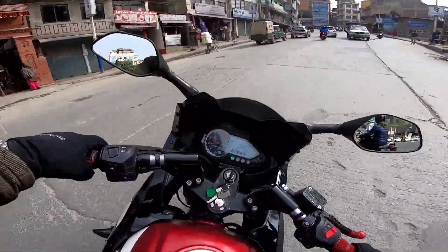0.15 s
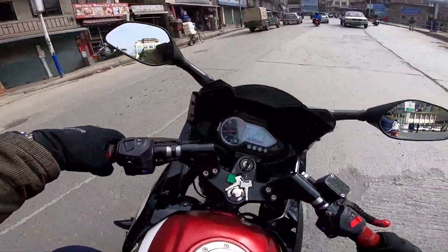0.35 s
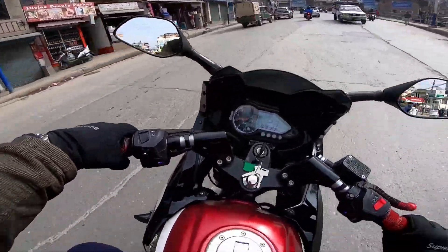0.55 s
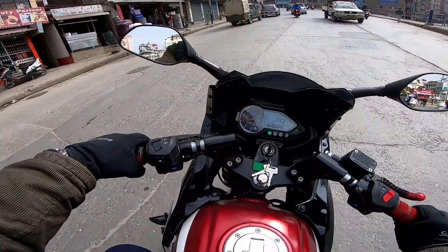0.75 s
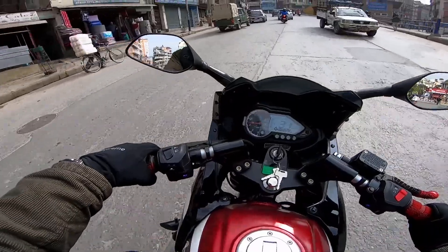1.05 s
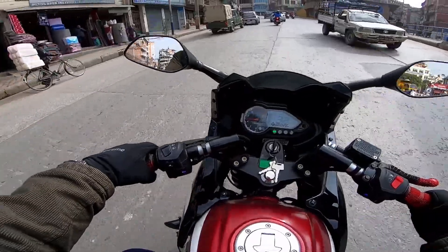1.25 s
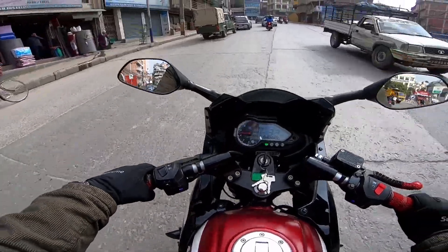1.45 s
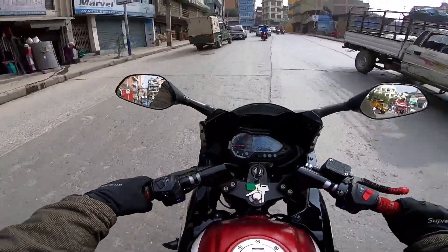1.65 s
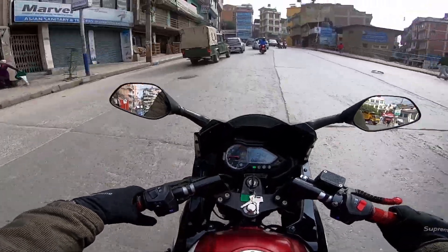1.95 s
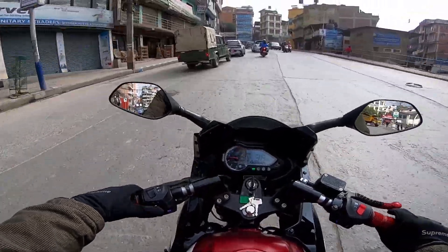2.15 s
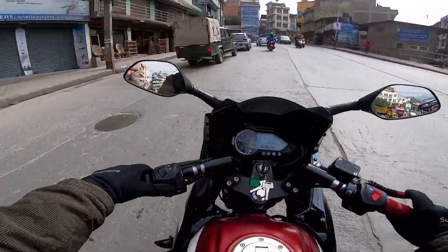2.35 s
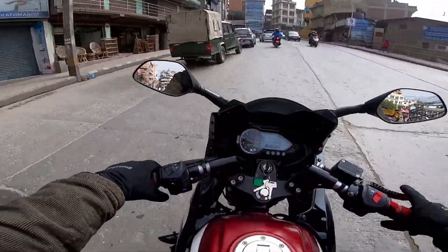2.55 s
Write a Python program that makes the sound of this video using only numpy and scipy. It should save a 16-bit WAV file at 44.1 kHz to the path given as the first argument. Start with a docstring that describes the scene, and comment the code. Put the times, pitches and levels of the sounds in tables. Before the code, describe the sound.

A single-cylinder motorcycle engine thrums and clatters throughout, close to the rider, over wind rumble and faint traffic. The revs flare briefly at 0.5 seconds, then climb steadily with a thin gear whine until the throttle shuts at 2.6. Faint tyre scuffs and high brake squeaks come mostly in the first second. A pickup swishes softly past around 1.4 seconds. Light plastic clicks and bodywork knocks are scattered along the way.

```python
"""Motorcycle on a busy street

A single-cylinder motorcycle, heard from the seat: the revs climb, flare once, and the throttle shuts.
Each firing booms through the pipe and airbox and sets the engine clattering; the crank shakes at twice
the firing rate and the gears whine. Around it are wind, traffic, a pickup passing the other way,
road scuffs, faint brake squeaks, plastic clicks and knocks of the bodywork over bumps."""
import sys
import numpy as np
from scipy.fft import rfft, irfft, next_fast_len
from scipy.io import wavfile
from scipy.ndimage import uniform_filter1d, minimum_filter1d, map_coordinates

SR = 44100
rng = np.random.default_rng(int(sys.argv[2]) if len(sys.argv) > 2 else 0)


def to_wav(sig):
    """Store sig (one row per channel, or 1-D mono) as 16-bit WAV at the path in sys.argv[1].

    Samples outside -1..1 are clipped; the rate is SR.
    """
    pcm = np.clip(np.atleast_2d(sig), -1, 1) * 32767
    pcm = np.round(pcm).astype(np.int16)
    wavfile.write(sys.argv[1], SR, pcm.T)  # frames by channels


N = 119070  # 2.7 s


def amp(db):
    """Turn decibels into a gain to multiply by."""
    return 10 ** (np.asarray(db) / 20)


def unit(x):
    """Scale a signal to an average (rms) size of 1."""
    return x / np.sqrt(np.mean(x ** 2) + 1e-20)


def along(points, hz):
    """Read between (f/Hz, value) points on a log frequency axis."""
    f, v = np.transpose(points)
    return np.interp(np.log(hz + 1), np.log(f + 1), v)


def clock():
    """The time of each sample in seconds."""
    return np.arange(N) / SR


def curve(rows):
    """Join (t/s, value) points with straight lines."""
    return np.interp(clock(), *np.transpose(rows))


def wobble(rate):
    """A smooth curve through `rate` random values a second."""
    return map_coordinates(rng.standard_normal(4096), [clock() * rate], mode="wrap")


def filtered(x, response):
    """Scale each frequency in x by the gain response(hz)."""
    size = next_fast_len(N + SR // 2)
    return irfft(rfft(x, size) * response(np.fft.rfftfreq(size, 1 / SR)), size)[..., :N]


# Stereo width, as side level against mid level: f/Hz, level/dB
STEREO_WIDTH = [(60, -65.5), (300, -28), (500, -38), (700, -17.5), (1400, -35), (2800, -30), (5000, -20),
                (10000, -14.5), (14000, -1.5)]

def noise(spectrum):
    """Stereo noise of rms 1, wider in the treble; the spectrum sets only its tone colour."""
    mid, side = filtered(rng.standard_normal((2, N)), lambda hz: amp(along(spectrum, hz)))
    side = filtered(side, lambda hz: amp(along(STEREO_WIDTH, hz)))
    return unit(np.array([mid + side, mid - side]))


# Tone colour of the street: f/Hz, level/dB
TRAFFIC_COLOUR = [(100, -9), (500, 1.5), (800, 1), (1400, -23), (2000, -12), (3400, -21.5), (4600, -21.5),
                  (8000, -30.5), (12000, -43.5), (15500, -58)]

def traffic(level_db=-38.5):
    """Traffic blends into a nearly steady wash."""
    return amp(level_db + .7 * wobble(6)) * noise(TRAFFIC_COLOUR)


# Tone colour of the wind: f/Hz, level/dB
WIND_COLOUR = [(3, -51), (15, -4), (24, -0.5), (45, -4.5), (75, -10.5), (120, -14.5), (200, -12),
               (400, -36.5), (1000, -80), (3000, -120)]

def wind(level_db=-23, gust_db=3):
    """The headwind rumbles in uneven gusts."""
    return amp(level_db) * unit(amp(gust_db * wobble(14)) * noise(WIND_COLOUR))


# Tone colour of the pickup's tyres: f/Hz, level/dB
TYRE_COLOUR = [(200, 6), (900, -4.5), (1500, -13), (2200, -22), (4000, -21.5), (7000, -24.5),
               (12000, -38.5), (15500, -47)]

def pickup(nearest_s=1.39, half_width_s=.47, peak_db=-35):
    """Tyre noise swells and fades as a pickup passes."""
    swell = 1 / (1 + ((clock() - nearest_s) / half_width_s) ** 2)
    return amp(peak_db) * swell * noise(TYRE_COLOUR)


# Rough patches of road: t/s, half length/s, level/dB
ROUGH_PATCHES = [(0.136, 0.057, -44), (0.229, .03, -44), (0.3, 0.023, -39), (0.453, .035, -38.5),
                 (0.673, .04, -40.5), (0.743, 0.02, -46)]
# Tone colour of a scuff: f/Hz, level/dB
SCUFF_COLOUR = [(800, -17), (1500, 7), (2600, 5), (3600, -5.5), (5000, -9), (8000, -13), (14000, -32)]

def scuffs():
    """The tyres scuff briefly over rough road."""
    level = sum(amp(db) * np.exp(-((clock() - s) / half) ** 2) for s, half, db in ROUGH_PATCHES)
    return level * noise(SCUFF_COLOUR)


# Brake squeaks: t/s, length/s, then level/dB of the low, middle and high tone
BRAKE_SQUEAKS = [(.266, .024, -57, -72, -68), (0.296, .03, -51, -63, -50), (.327, 0.012, -57, -66, -44),
                 (.345, .035, -58, -60, -60), (0.424, .045, -53, -70, -58), (0.462, .06, -59, -70, -53),
                 (.52, .07, -67, -72, -60), (1.245, 0.035, -67, -75, -64), (1.383, 0.027, -59, -72, -74),
                 (2.31, 0.032, -58, -67, -67), (2.392, 0.06, -57, -71, -71)]

def brake(tones_hz=(8480, 9780, 11300), rub_db=(-75, -80, -73), waver_hz=84):
    """A lightly rubbing brake disc sings in three high, unsteady tones."""
    out = np.zeros(N)
    for tone, hz in enumerate(tones_hz):
        level = amp(rub_db[tone])
        for start, length, *levels_db in BRAKE_SQUEAKS:
            progress = np.clip((clock() - start) / length, 0, 1)
            level += amp(levels_db[tone]) * np.sqrt(np.abs(np.sin(np.pi * progress)))
        pitch = hz + waver_hz * (wobble(500) + .27 * wobble(25))
        flicker = amp(1.8 * wobble(120) + 2.7 * wobble(17))
        out += level * flicker * np.sin(2 * np.pi * np.cumsum(pitch) / SR)
    return out


# Plastic clicks: t/s, relative level/dB
PLASTIC_CLICKS = [(0.2568, -35), (0.2935, -32), (0.8616, -42), (0.8766, -31), (0.9066, -36), (2.0066, -37),
                  (2.0205, -33.5), (2.0496, -35), (2.5778, -32)]
# Tone colour of a click: f/Hz, level/dB
CLICK_COLOUR = [(1500, -20), (4500, 3), (7000, 0), (11000, -3), (15500, -14)]

def clicks(gain_db=-6, tick_s=.008, rattle_s=.19, rattle_db=-12):
    """Loose plastic ticks and rattles; each part fades by 60 dB in its given time."""
    level = np.zeros(N)
    for start, db in PLASTIC_CLICKS:
        age = np.maximum(clock() - start, 0)
        tick = amp(-60 * age / tick_s)
        rattle = amp(rattle_db - 60 * age / rattle_s)
        level += (age > 0) * amp(db + gain_db) * (tick + rattle)
    return level * noise(CLICK_COLOUR)


# Bumps in the road: t/s, relative level/dB
BUMPS = [(0.245, -27), (0.491, -24.5), (.518, -25), (0.735, -25), (1.046, -22), (1.61, -21.5), (2.491, -27)]
# Tone colour of a knock: f/Hz, level/dB
KNOCK_COLOUR = [(300, -29), (700, -10), (1200, 3), (1550, -1), (2000, -20.5), (4000, -33.5), (12000, -82.5)]

def knocks(rise_s=.0032, fade_s=.093):
    """The bodywork knocks as the wheels meet bumps."""
    level = np.zeros(N)
    for start, db in BUMPS:
        age = np.maximum(clock() - start, 0)
        level += (1 - np.exp(-age / rise_s)) * amp(db - 60 * age / fade_s)
    return level * noise(KNOCK_COLOUR)


def pulse(cycles, at, depth_db):
    """A swell at the fraction `at` of every cycle; a negative depth makes a dip."""
    return unit(amp(depth_db * np.cos(2 * np.pi * (cycles - at))))


# Tone colour of the valve hiss: f/Hz, level/dB
HISS_COLOUR = [(1000, -6), (2200, 9.5), (3500, -3.5), (4600, 4), (6000, -6), (8000, -6.5), (11000, -17),
               (15000, -34)]

def valve_hiss(cycles, level_db=-51):
    """The valve gear hisses, swelling once per engine cycle."""
    return amp(level_db + 1.9 * wobble(18)) * pulse(cycles, at=.043, depth_db=4) * noise(HISS_COLOUR)


# Tones of the whine: multiple of the firing rate, level/dB
WHINE_TONES = [(17, -48.5), (18, -46), (20, -48.5), (22, -48), (24, -46), (26, -48), (28, -46.5),
               (30, -42.5), (32, -57), (33, -58.5), (34, -52), (37, -54), (38, -52.5)]
# Boost to all those tones: t/s, level/dB
WHINE_BOOST = [(0, -10), (.95, 2), (1.2, 8.5), (1.7, 3), (2.1, 2), (2.7, 1)]

def whine(cycles):
    """Gears and cam chain sing thin, unsteady tones that follow the revs."""
    tones = np.zeros(N)
    for multiple, db in WHINE_TONES:
        level = amp(db + 2.2 * wobble(5.25))
        phase = 2 * np.pi * (multiple * cycles + rng.random()) + .35 * wobble(9.98)
        tones += level * np.cos(phase)
    return amp(curve(WHINE_BOOST)) * tones


# Loudness of the clatter: t/s, level/dB
CLATTER_LOUDNESS = [(0, -33.5), (.22, -30.5), (.38, -33), (.5, -30), (.6, -32.5), (1.0, -34), (1.1, -32),
                    (1.5, -31.5), (1.62, -32), (1.72, -32), (2.3, -30.5), (2.7, -36.5)]
# Its tone colour: f/Hz, level/dB
CLATTER_COLOUR = [(100, -46.5), (300, -15), (600, -4), (900, -3.5), (1250, -2.5), (1550, -5), (1800, -12.5),
                  (2500, -19.5), (3500, -26.5), (8000, -59), (14000, -120)]

def clatter(cycles):
    """Piston and valves clatter, pulsing gently once and twice per cycle."""
    level = amp(curve(CLATTER_LOUDNESS) + .84 * wobble(45.96))
    beat = pulse(cycles, at=.88, depth_db=.5) * pulse(2 * cycles, at=.57, depth_db=.9)
    return level * beat * noise(CLATTER_COLOUR)


# Loudness of the chuffing: t/s, level/dB
CHUFF_LOUDNESS = [(0, -20.5), (.35, -27), (.5, -22), (.62, -25), (.75, -29.5), (1.05, -28.5), (1.6, -27),
                  (2.2, -25), (2.7, -25)]
# Its tone colour: f/Hz, level/dB
CHUFF_COLOUR = [(60, -40), (120, -20.5), (180, -13.5), (230, -11.5), (285, 2), (340, -1), (400, 3),
                (480, 0.5), (560, -6), (660, -15.5), (1000, -53), (2000, -120)]

def chuff(cycles):
    """Swirling gas makes a puff of noise with each firing."""
    return amp(curve(CHUFF_LOUDNESS)) * pulse(cycles, at=.11, depth_db=-2) * noise(CHUFF_COLOUR)


# Loudness of the crank's shake: t/s, level/dB
SHAKE_LOUDNESS = [(0, -17), (.3, -13), (1.0, -13), (1.8, -10.5), (2.62, -13), (2.67, -31), (2.7, -11.5)]

def crank_shake(cycles):
    """The spinning crank shakes the bike, a deep hum at twice the firing rate."""
    return -amp(curve(SHAKE_LOUDNESS) + .85 * wobble(15.13)) * np.cos(2 * np.pi * 2 * cycles)


# Push of the throttle: t/s, level/dB
THROTTLE_PUSH = [(0, -1), (.28, 3.5), (.41, 2), (.48, -0.5), (.6, 3.5), (1.0, 2.5), (1.5, 0.5), (2.0, -1),
                 (2.58, -1.5), (2.61, -14.5), (2.7, -11.5)]
# How much of that push each frequency gets: f/Hz, share
PUSH_SHARE = [(100, .7), (180, 0.1), (280, 0.97), (350, 0.39), (450, 0.21), (700, 0.092)]
# Resonances of pipe and airbox, the base level of a tone there: f/Hz, level/dB
PIPE_RESONANCES = [(35, -20.5), (110, -24.5), (140, -25), (180, -25), (210, -36), (240, -24), (275, -17.5),
                   (315, -15), (345, -22.5), (385, -27), (420, -33), (455, -27), (520, -28), (560, -34.5),
                   (640, -36), (750, -50.5)]
# What each tone adds: multiple of the firing rate, level/dB at cruise, growth/dB per Hz above cruise
FIRING_TONES = [(1, -5, -.7), (3, 0.5, -0.95), (4, 4, 0.9), (5, -1, 0.5), (6, 0.5, 0.78), (7, -0.5, -0.41),
                (8, 0.5, 0.56), (9, 1.5, -0.17), (10, -8, 1), (11, -4.5, 0.53), (12, 5.5, .5), (13, 0, 0.5),
                (14, -4.5, 0.04), (15, 0.5, 1), (16, 1, 2)]

def firings(cycles, rate, cruise_hz=40, resonance_hz=360.4, boom_hz=175, blend_hz=23):
    """One suction pulse per cycle; its tones slide through the pipe's resonances as the revs change."""
    uneven_cycles = cycles + .0056 * wobble(29.72)
    push_db = curve(THROTTLE_PUSH) - .02 * wobble(40)
    out = np.zeros(N)
    for multiple, db, growth in FIRING_TONES:
        hz = multiple * rate
        level_db = along(PIPE_RESONANCES, hz) + db + growth * (rate - cruise_hz)
        level_db += push_db * along(PUSH_SHARE, hz) + 1.9 * wobble(6.93)
        # Tones above the main resonance arrive late; the low boom arrives early.
        lag_rad = 3.88 * (1 + np.tanh((hz - resonance_hz) / blend_hz)) / 2
        lead_rad = .9 * (1 - np.tanh((hz - boom_hz) / blend_hz)) / 2
        phase = multiple * (2 * np.pi * uneven_cycles + .14 * wobble(1.425))  # high tones smear more
        out -= amp(level_db) * np.cos(phase - lag_rad + lead_rad)
    return out


# Firings per second: t/s, f/Hz
FIRING_RATE = [(0.0, 31.98), (0.12, 33.77), (0.25, 35.54), (0.41, 35.32), (0.48, 40.73), (0.52, 38.53),
               (0.58, 36.25), (0.68, 37.11), (0.86, 37.97), (1.0, 38.7), (1.18, 40.08), (1.4, 40.49),
               (1.6, 41.94), (1.78, 42.53), (1.96, 44.22), (2.2, 45.2), (2.38, 46.39), (2.7, 46.23)]

def engine(first_firing_s=.0156):
    """All the engine's sounds keep time with one count of its firing cycles."""
    rate = curve(FIRING_RATE)
    cycles = np.cumsum(rate) / SR - first_firing_s * rate[0]
    machinery = crank_shake(cycles) + chuff(cycles) + clatter(cycles) + valve_hiss(cycles)
    return machinery + firings(cycles, rate) + whine(cycles)


def scene():
    """Everything as it reaches the rider."""
    return engine() + pickup() + traffic() + scuffs() + wind() + brake() + clicks() + knocks()


def record(dry, ceiling=.92, fade_in_s=.004, top_hz=15800):
    """Hold the loudest peaks down, fade in quickly and cut the highest treble."""
    needed_gain = np.minimum(1, ceiling / (np.abs(dry).max(axis=0) + 1e-9))
    held_gain = minimum_filter1d(needed_gain, size=800)
    smooth_gain = uniform_filter1d(uniform_filter1d(held_gain, size=400), size=400)
    fade_in = np.minimum(1, clock() / fade_in_s)
    return filtered(dry * smooth_gain * fade_in, lambda hz: hz < top_hz)


dry = scene()
out = record(dry)
to_wav(out)
```